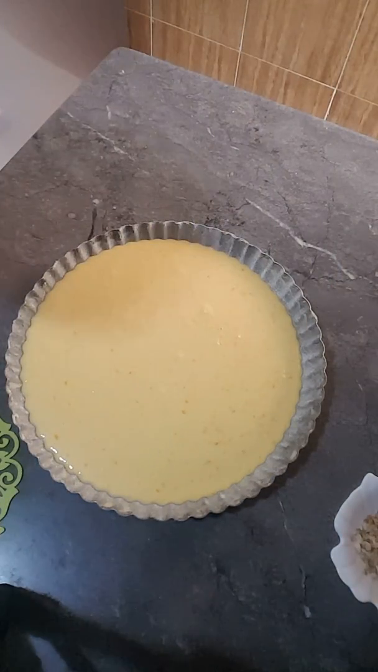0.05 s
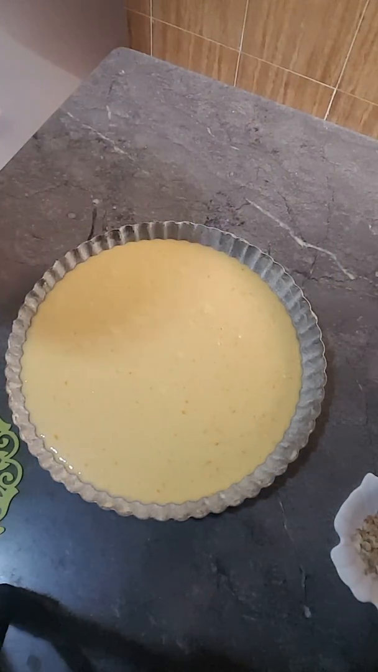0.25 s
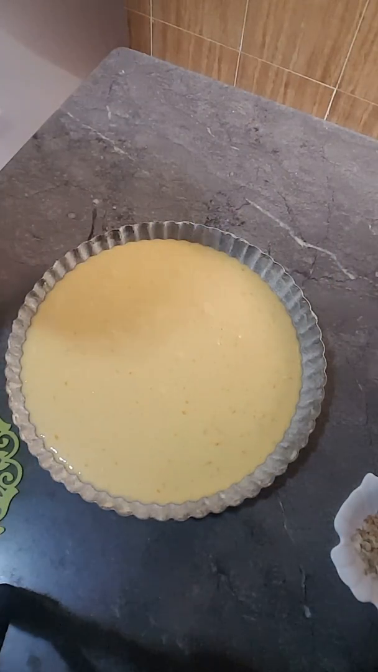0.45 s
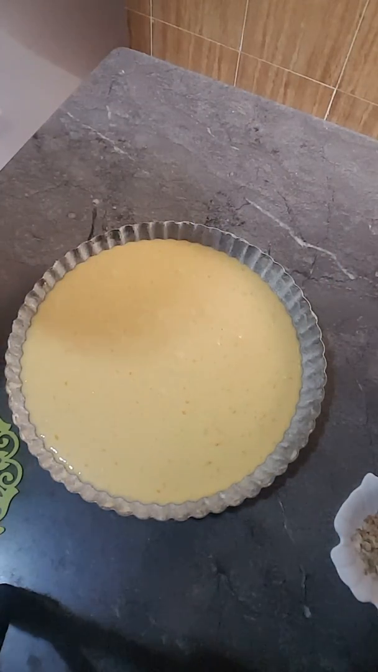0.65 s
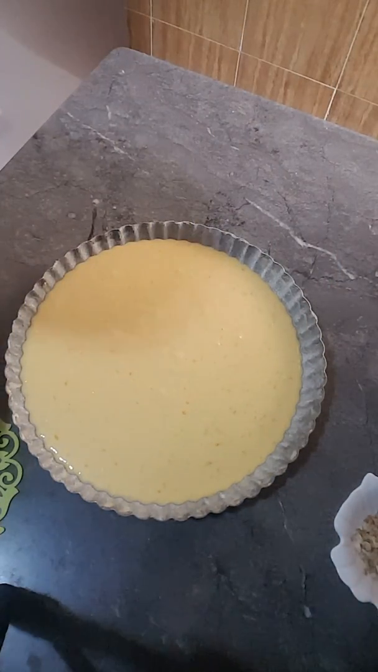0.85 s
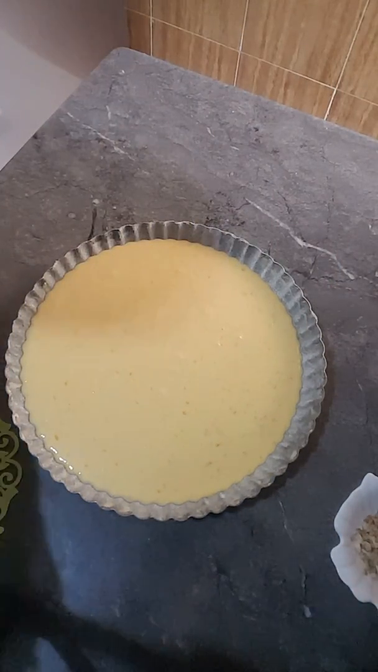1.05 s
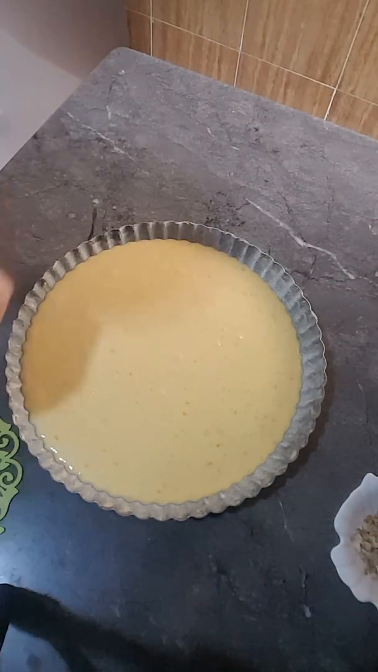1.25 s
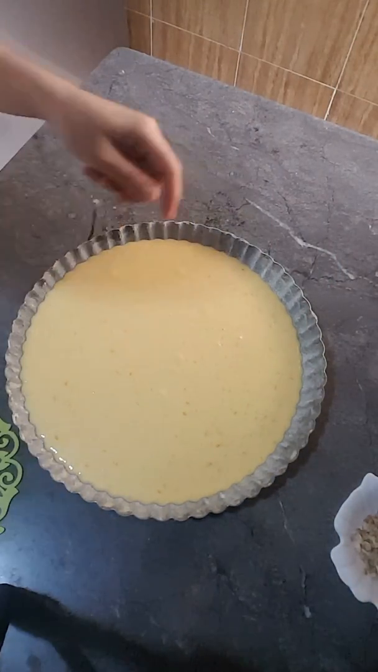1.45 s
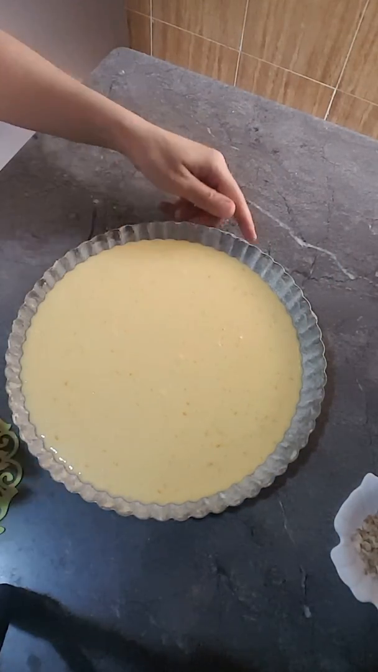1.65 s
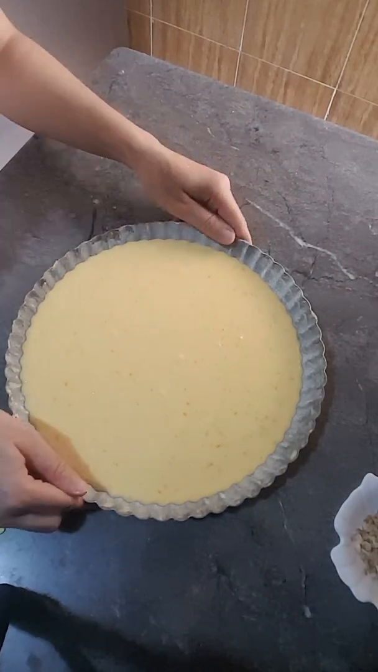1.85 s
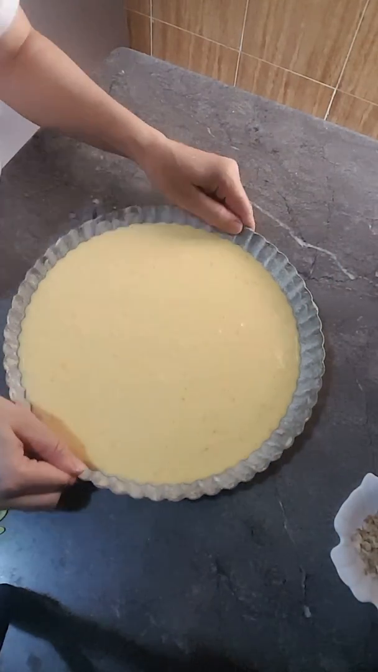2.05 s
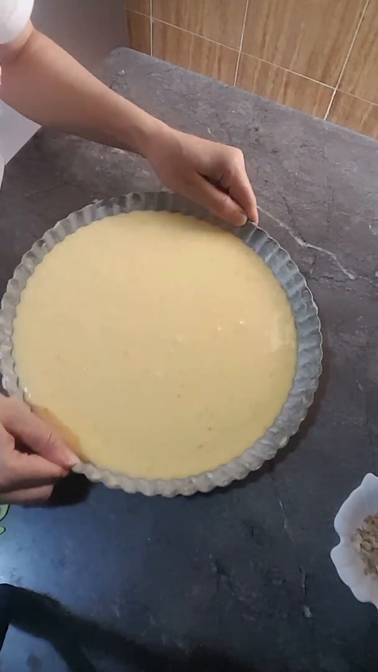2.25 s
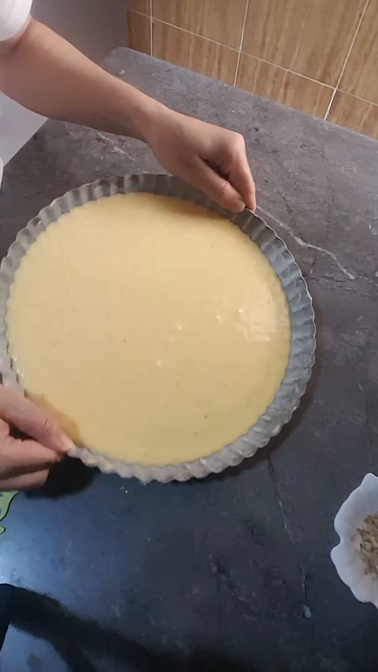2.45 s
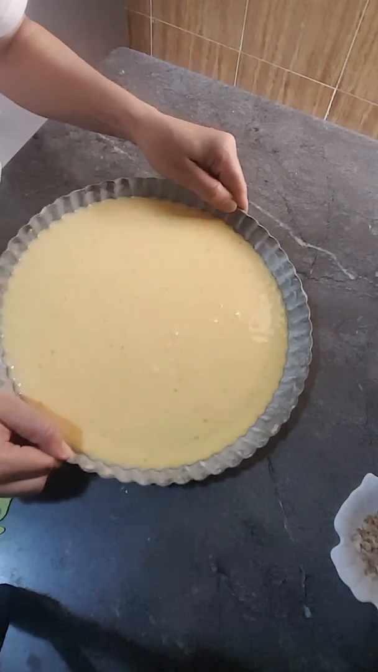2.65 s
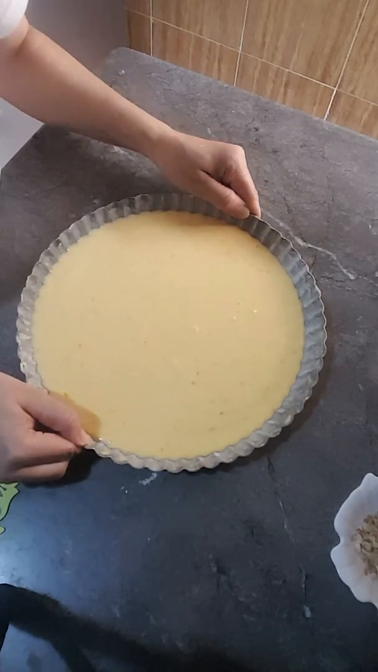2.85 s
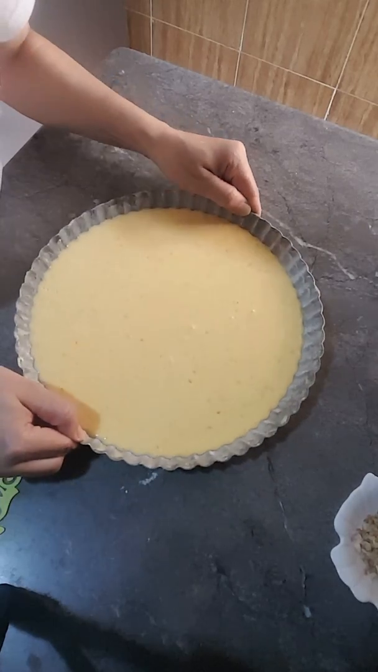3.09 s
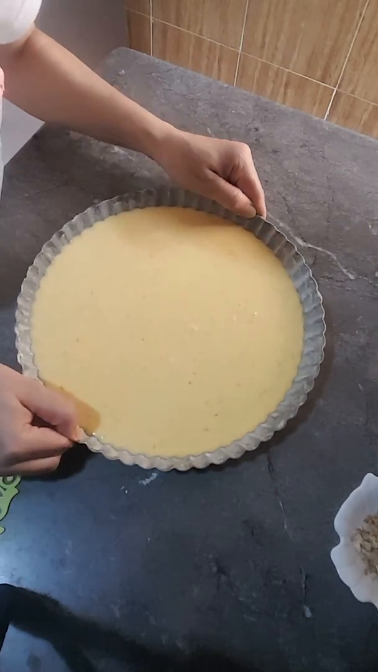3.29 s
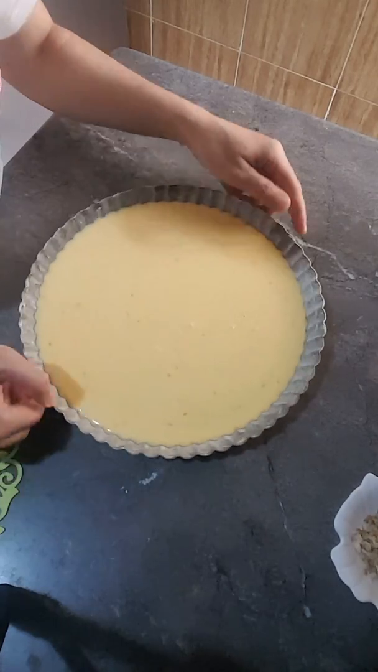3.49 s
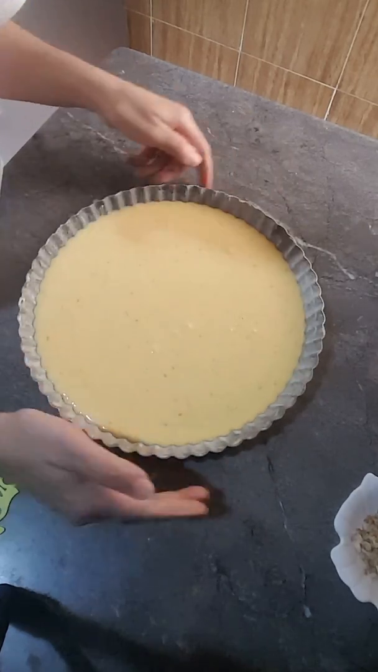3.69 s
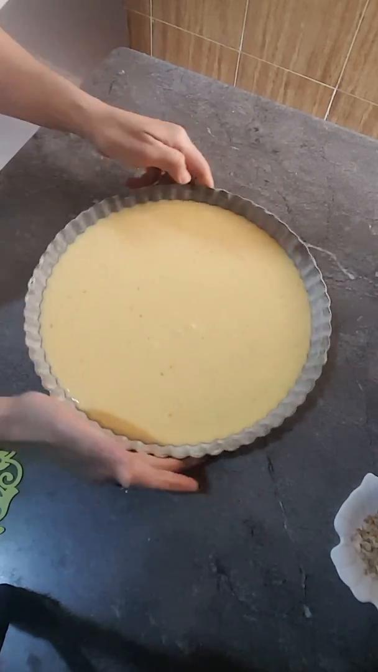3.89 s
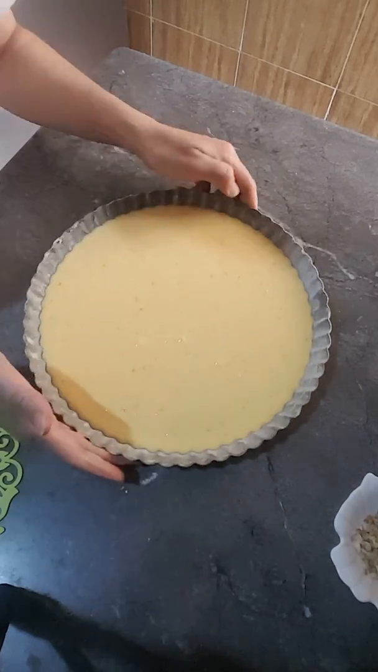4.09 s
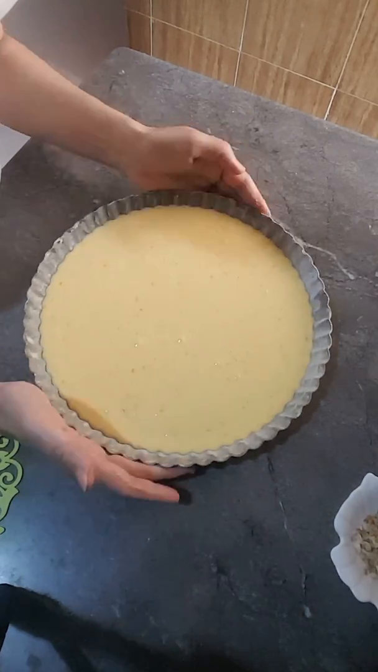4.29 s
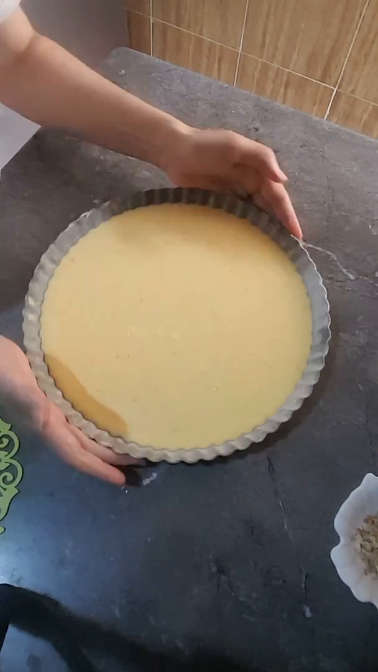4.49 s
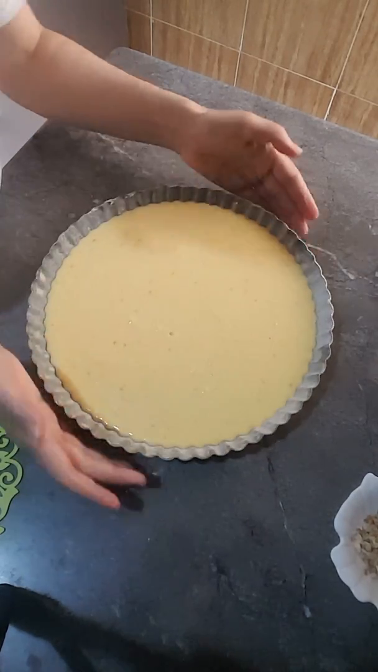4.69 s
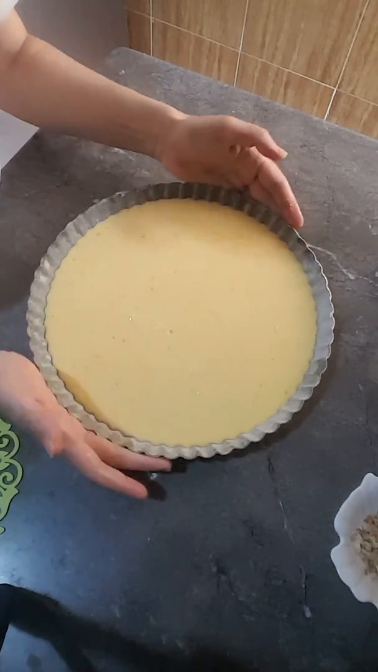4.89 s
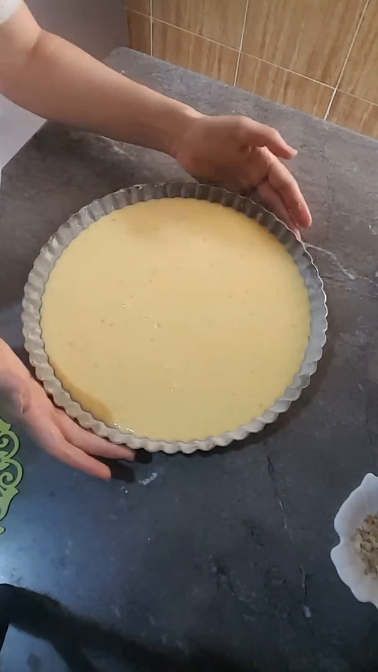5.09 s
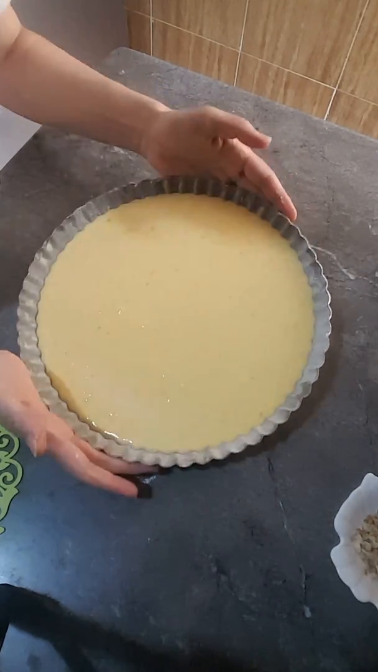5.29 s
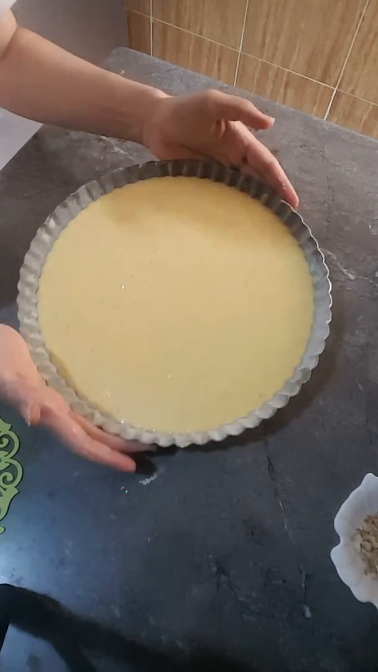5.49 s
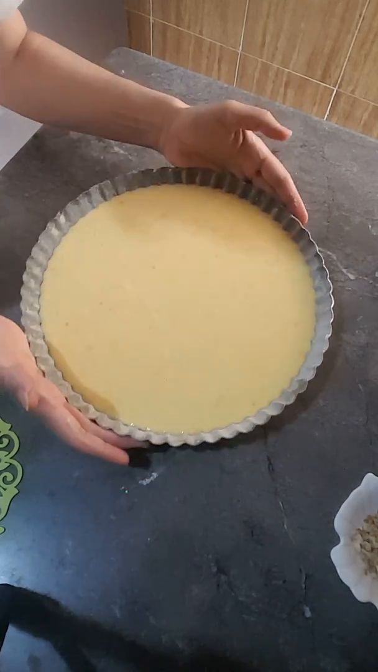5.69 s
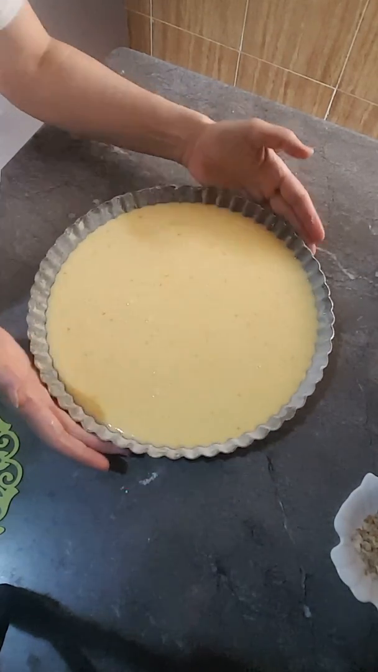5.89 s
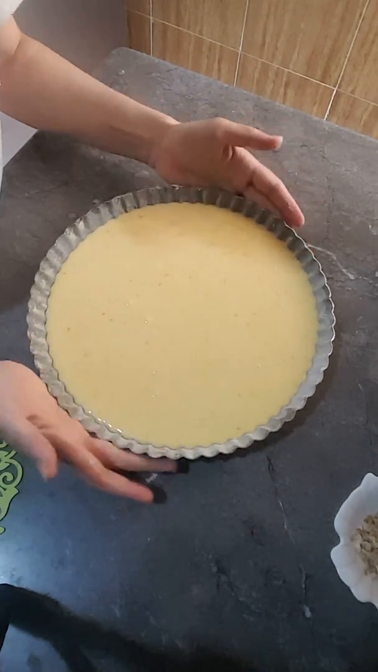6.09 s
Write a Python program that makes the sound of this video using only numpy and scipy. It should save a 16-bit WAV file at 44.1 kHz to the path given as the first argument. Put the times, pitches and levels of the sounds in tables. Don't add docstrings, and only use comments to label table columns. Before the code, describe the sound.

In a small tiled kitchen, a spatula taps and scrapes faintly in a bowl, with one brighter rap near a second in. Then a thin metal tin heavy with batter is knocked on stone in several loud clacking bursts, followed by duller, more spaced drops. Close stereo microphone, short hard room ring, soft fridge hum beneath.

```python
import sys
import numpy as np
from scipy import signal
from scipy.io import wavfile
from scipy.ndimage import uniform_filter1d

SR = 44100
rng = np.random.default_rng(int(sys.argv[2]) if len(sys.argv) > 2 else 0)


def invert_db(level):
    return 10 ** (np.asarray(level, dtype=float) / 20)


def bounce(signal):
    frames = np.transpose(np.atleast_2d(signal))
    limited = np.clip(frames, -1, 1)
    pcm = np.round(limited * 32767).astype(np.int16)
    wavfile.write(sys.argv[1], SR, pcm)


N = 270774

# start_s, level_db, flatness_db (how much of the base lands),
# edge_hardness_db, favoured_hz
TIN_KNOCKS = [(2.1608, -54.5, -12.5, -25, 1055), (2.2806, -19, -13, -16, 1060),
              (2.5377, -5, -19, -10.5, 1050), (2.7755, -30, -4.5, -27, 774), (2.9199, -4, -24, -22.5, 1050),
              (2.9324, -9.5, -14, -18, 600), (2.9384, -5.5, 0.5, -5, 330), (3.0829, -27, -7.5, -19, 720),
              (3.1174, -27, -3.5, -16.5, 480), (3.1483, -37.5, -3, -21.5, 580),
              (3.262, -7.5, -16.5, -10, 1378), (3.2979, -15.5, -5, -13, 1340),
              (3.3304, -5, -15.5, -11, 1340), (3.4251, -7.5, -23.5, -3, 1680),
              (3.4379, -10.5, -1, -18, 322.5), (3.4615, -18.5, 1.5, -21.5, 334)]
TIN_DROPS = [(3.894, -51.5, 4.5, -5, 320), (4.1411, -10, -19, -12.5, 1070), (4.1529, -14.5, 4.5, -24, 882),
             (4.1632, -11.5, -2.5, -7, 606), (4.1712, -9, -14.5, -35, 430), (4.6015, -13.5, 10, 2, 410),
             (4.6186, -19, 0.5, -22, 430), (4.6267, -12, -3.5, -15, 1704), (4.6357, -21, 3, -30.5, 391),
             (4.908, -57, 12, -24, 320), (4.9456, -50, 5, -34.5, 324), (5.0976, -15, 1, -16, 579),
             (5.1152, -20, 1, -50.5, 430), (5.3264, -32.5, 0.5, -26, 340), (5.892, -5.5, -11, -11.5, 707),
             (5.916, -20.5, -14.5, -8.5, 765), (5.9757, -17.5, 8, -12, 392),
             (4.596, -27.5, 8.5, -9, 570),
    (5.110, -14.5, -3.5, -4.5, 1290),
    (5.9645, -28.5, -15.5, -8.5, 706),
]
SPATULA_TICKS = [
    (0.0004, -38.5, -6, -9, 560),
    (0.3203, -39, -1, 0, 343),
    (0.950, -66, -13, 3.5, 1310),
    (1.0854, -22.5, -2, 2, 2146),
    (1.1074, -33, 14, -6.5, 390),
]
# start_s, held_s, level_db, brightness_db
SPATULA_DRAGS = [
    (0.03, 0.12, -48, -2.5),
    (0.48, 0.081, -51, -7.5),
    (0.926, 0.0087, -61.5, -2.5),
    (1.14, 0.028, -28, -7),
]
# start_s, held_s, level_db, brightness_db
TIN_SLIDES = [
    (1.875, 0.04, -51, -12),
    (1.955, 0.02, -56.5, -12.5),
    (2.05, 0.079, -62, -4),
    (3.93, 0.025, -50.5, -6),
    (4.46, 0.22, -51.5, -5),
    (5.088, 0.006, -25, -18.5),
]
ZONE_HZ = [120, 320, 710, 1480, 3600]
# pitch_hz, level_db
TIN_MODES = [(100, 4.5), (140, -0.5), (200, -1.5), (260, -6), (328, -0.5), (430, 3.5), (570, 3.5),
             (740, 3.5), (845, -0.5), (920, -0.5), (1040, 1), (1180, -8.5), (1340, -0.5), (1465, -6.5),
             (1640, -2), (1775, -6.5), (1960, -9.5), (2290, -3.5), (2550, -9.5), (2850, -5), (3200, -14),
             (3670, -16.5), (4180, -21), (4600, -26), (5100, -23), (5600, -24), (6200, -30.5), (6900, -33),
             (7700, -35.5)]
# pitch_hz, level_db
BOWL_MODES = [(100, 5), (130, -1), (195, 1), (270, -12.5), (365, 5), (420, 1.5), (575, 4), (690, 3.5),
              (860, -0.5), (1050, -8), (1310, -1), (1550, -8), (1800, -4), (2030, -1.5), (2300, -3.5),
              (2550, -5), (2900, -3.5), (3300, -8.5), (3700, -14.5), (4200, -18.5), (4800, -21.5),
              (5400, -22), (6100, -30), (6900, -30)]
# pitch_hz, level_db, t60_s
KITCHEN_RING = [(43.4, -5.5, 0.3), (94, -8, 0.84), (198, -4, .45), (399.7, -6.5, 0.42), (990, -1.5, 0.4),
                (2500, -4, 0.43), (4000, 0, 0.44), (7150, -2.5, 0.47), (11900, 0.5, .3)]
MOVES_S = [0, 1.0, 2.5, 2.9, 3.24, 3.8, 4.5, 5.03, 5.8]
# pitch_hz, left_minus_right_db
NEAR_PAN = [(60, -1.0), (91, -3), (140, 4.5), (210, -5), (320, -3), (490, 0), (740, 6.5), (1130, -7),
            (1710, -16), (2600, -11.5)]
# pitch_hz, likeness (0-1)
ALIKE = [(60, 0.87), (100, 1), (180, 0.91), (300, 0.9), (520, 0.2), (890, 0.2), (1520, 0), (2600, 0)]
# pitch_hz, density_db (per Hz)
QUIET_NOISE = [(25, -88), (45, -76.5), (65, -91), (100, -74), (200, -87.5), (400, -89.5), (800, -100),
               (1600, -105), (3200, -112), (6300, -121), (10000, -126), (12500, -121), (15500, -121)]
# multiple of the motor pitch, level_db (rms)
FRIDGE_LINES = [(2, -62), (4, -74), (9, -69.5), (12, -73), (15, -98), (17, -78.5)]

TIN_CYCLES, BOWL_CYCLES = 27, 30
# (dB at zero flatness, dB per dB of flatness)
TIN_THUMP, TIN_WALL = (-17.5, 0.55), (-2.7, 0.42)
BOWL_THUMP, BOWL_WALL = (-13, 1), (2, -0.23)
FAVOUR_DB, FAVOUR_OCTAVES = 4.5, 0.19
LIGHT_DB, PURE_DB = -33, 5
LEFT_LAG_S = 0.00019
KITCHEN_DB, KITCHEN_RISE_S = -31.5, 0.0013
CORNER_DB, CORNER_S = 3.0, 0.01
FRIDGE_HZ, QUIET_PAN_DB = 48.45, -2


def blows(events, modes, cycles, thump, wall, gain_db):
    out, modes = np.zeros((2, N + SR)), np.array(modes)
    hz = modes[:, 0]
    chance = rng.standard_normal((len(events), 2, len(modes)))
    for (s, rim_db, flat_db, edge_db, spot_hz), (size_db, shift) in zip(events, chance):
        thump_db = thump[0] + thump[1] * flat_db
        wall_db = wall[0] + wall[1] * flat_db
        zone_db = np.interp(np.log(hz), np.log(ZONE_HZ), [thump_db, flat_db, wall_db, 0, edge_db])
        favour_db = FAVOUR_DB + np.clip(LIGHT_DB - rim_db, 0, PURE_DB)
        zone_db = zone_db + favour_db * np.exp(-(np.log2(hz / spot_hz) / FAVOUR_OCTAVES) ** 2)
        shifted = modes * (1 + .015 * shift[:, None] * [1, 0])
        sound = ring(shifted, invert_db(rim_db + zone_db + size_db + gain_db), cycles)
        start = int(s * SR)
        out[:, start:start + sound.shape[1]] += sound
    return out[:, :N]


def ring(modes, gain, cycles, rise_cycles=0.079, contact_s=0.00046):
    hz, db = np.transpose(modes)[:, :, None]
    t = np.arange(int(.09 * SR)) / SR
    t60 = cycles / hz * (hz / 1000) ** .3
    pan_db = on_log(hz, NEAR_PAN) / 2
    gain = (gain * (-1.) ** np.arange(len(gain)))[:, None]
    ports = []
    for lag, side_db in ((LEFT_LAG_S, pan_db), (0, -pan_db)):
        u = np.maximum(t - lag, 0)
        rise = (1 - np.exp(-u / (contact_s + rise_cycles / hz))) ** 2
        decay = np.exp(-np.log(1000) * u / t60)
        swing = decay * rise * np.sin(2 * np.pi * hz * u)
        ports.append((gain * invert_db(db + side_db) * swing).sum(0))
    return np.array(ports)


def rub(strokes, modes, cycles, rate, grit_db, gain_db, rise_db_s, fall_db_s):
    low, high, t = np.zeros(N), np.zeros(N), np.arange(N) / SR
    for start, held, db, bright_db in strokes:
        press = invert_db(db + stroke_db(t, start, held, rise_db_s, fall_db_s))
        low = low + press
        high = high + press * invert_db(bright_db)
    slips = (rng.random(N) < rate / SR) * rng.standard_normal(N)
    slips = slips * invert_db(grit_db * rng.exponential(size=N))
    modes = np.array(modes)[2:]
    upper = 1. * (modes[:, 0] > 1000)
    out = 0
    for share, level in ((1 - upper, low), (upper, high)):
        body = ring(modes, share, 1.2 * cycles)
        body = body / np.sqrt(np.sum(body ** 2) * rate / SR)
        out = out + signal.fftconvolve((slips * level)[None], body, axes=1)[:, :N]
    return out * invert_db(gain_db)


def stroke_db(t, start, held, rise_db_s, fall_db_s):
    before, after = np.maximum(start - t, 0), np.maximum(t - start - held, 0)
    return -rise_db_s * before - fall_db_s * after


def kitchen(near):
    out = np.zeros((2, N + SR))
    cuts = [int(s * SR) for s in MOVES_S] + [N]
    for start, end in zip(cuts, cuts[1:]):
        wet = signal.fftconvolve(near[:, start:end].mean(0)[None], tail(), axes=1)
        out[:, start:start + wet.shape[1]] += wet
    return out[:, :N]


def tail():
    t = np.arange(SR * 2 // 3) / SR
    dense = 0
    for hz in 45 * 2 ** np.arange(0, 8.6, .5):
        fall = np.exp(-np.log(1000) * t / on_log(hz, KITCHEN_RING, axis=2))
        dense = dense + invert_db(on_log(hz, KITCHEN_RING)) * fall * pair(hz, len(t))
    early = 1 + invert_db(CORNER_DB) * np.exp(-t / CORNER_S)
    return dense * early * (1 - np.exp(-t / KITCHEN_RISE_S)) * invert_db(KITCHEN_DB)


def quiet():
    noise, swell = 0, walk(2.8)
    for hz in 28 * 2 ** np.arange(0, 9.3, .5):
        level_db = on_log(hz, QUIET_NOISE) + 0.38 * swell + 0.72 * walk(4.8)
        noise = noise + invert_db(level_db) * pair(hz, N)
    turns = 2 * np.pi * np.cumsum(FRIDGE_HZ * (1 + .004 * walk(3))) / SR
    hum = 0
    for k, db in FRIDGE_LINES:
        waver = 1 + .7 * walk(12)
        hum = hum + np.sqrt(2) * invert_db(db) * waver * np.sin(k * turns + k * k)
    sound = noise * np.sqrt(SR / 2) + hum
    return sound * invert_db(np.array([[QUIET_PAN_DB], [-QUIET_PAN_DB]]) / 2)


def walk(rate):
    k = int(SR / rate)
    held = np.repeat(rng.standard_normal(N // k + 1), k)
    slewed = uniform_filter1d(uniform_filter1d(held, k), k)[:N]
    return slewed / slewed.std()


def pair(hz, size):
    alike = np.clip(on_log(hz, ALIKE), 0, 1)
    mid, side = band(rng.standard_normal((2, size)), hz, 0.52)
    return np.sqrt(1 + alike) * mid + np.sqrt(1 - alike) * side * np.array([[1], [-1]])


def band(x, hz, octaves):
    edges = [hz * 2 ** (-octaves / 2), min(hz * 2 ** (octaves / 2), .49 * SR)]
    return signal.sosfilt(signal.butter(2, edges, "bandpass", fs=SR, output="sos"), x)


def on_log(hz, table, axis=1):
    table = np.array(table, float)
    return np.interp(np.log(hz), np.log(table[:, 0] + 1), table[:, axis])


def scene():
    landings = TIN_KNOCKS + TIN_DROPS
    near = blows(landings, TIN_MODES, TIN_CYCLES, TIN_THUMP, TIN_WALL, gain_db=0.0)
    near = near + blows(SPATULA_TICKS, BOWL_MODES, BOWL_CYCLES, BOWL_THUMP, BOWL_WALL, gain_db=1.5)
    near = near + rub(SPATULA_DRAGS, BOWL_MODES, BOWL_CYCLES, rate=2400.0, grit_db=2.0, gain_db=-2.5,
                      rise_db_s=598.0, fall_db_s=180.0)
    near = near + rub(TIN_SLIDES, TIN_MODES, TIN_CYCLES, rate=2500.0, grit_db=2.0, gain_db=-1.0,
                      rise_db_s=901.0, fall_db_s=496.5)
    return near + kitchen(near) + quiet()


def roll_off(x):
    return signal.sosfilt(signal.butter(12, 15750, fs=SR, output="sos"), x)


def record(dry):
    x = signal.sosfilt(signal.butter(2, 45, "highpass", fs=SR, output="sos"), dry)
    keep = np.exp(-1 / (.5 * SR))
    recent = signal.lfilter([1 - keep], [1, -keep], np.abs(x).mean(0))
    x = x / (1 + recent / invert_db(-26)) ** 0.2
    loudness = uniform_filter1d(np.abs(x), 40, axis=1) ** 1.4
    treble_hash = loudness * band(rng.standard_normal(x.shape), 14000, 0.68) * invert_db(-46.5)
    saturated = 1.109 * np.tanh(x / 1.22)
    return roll_off(saturated + treble_hash)


dry = scene()
out = record(dry)
bounce(out)
```